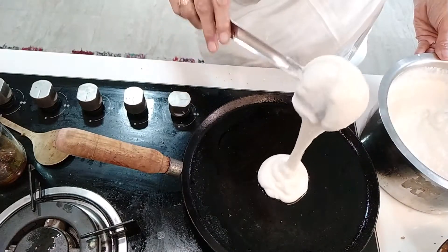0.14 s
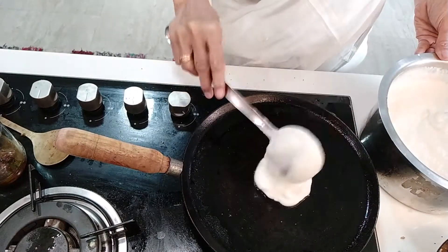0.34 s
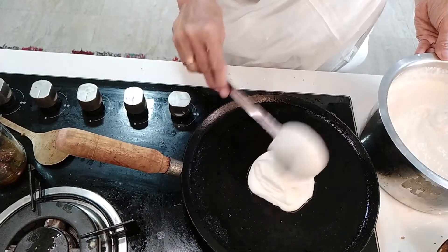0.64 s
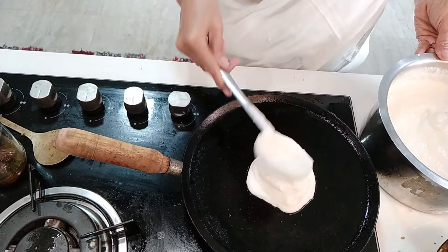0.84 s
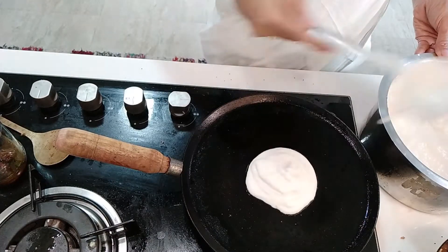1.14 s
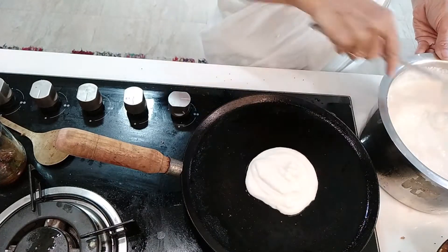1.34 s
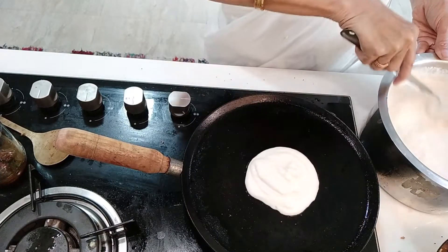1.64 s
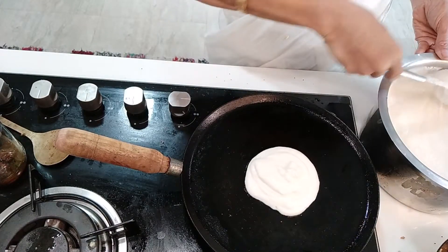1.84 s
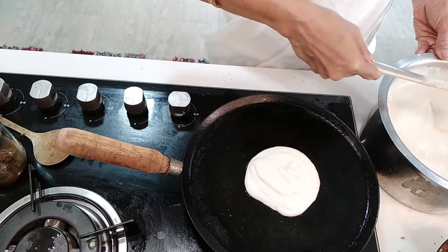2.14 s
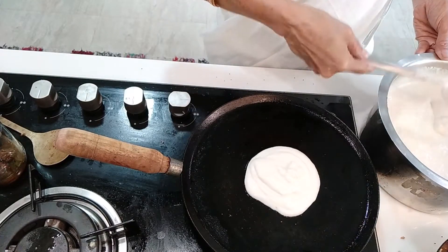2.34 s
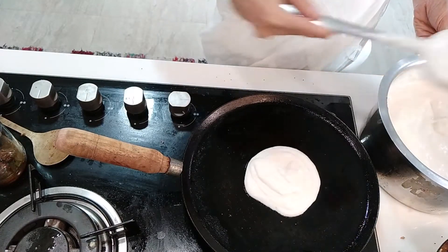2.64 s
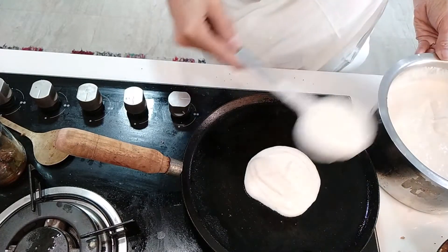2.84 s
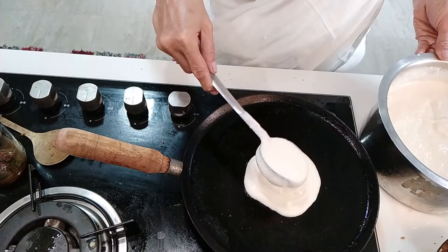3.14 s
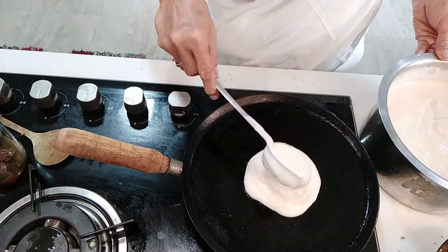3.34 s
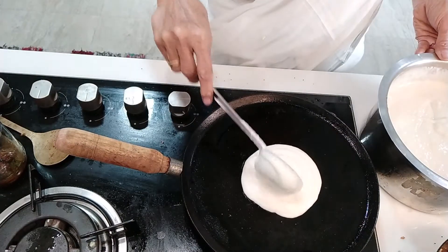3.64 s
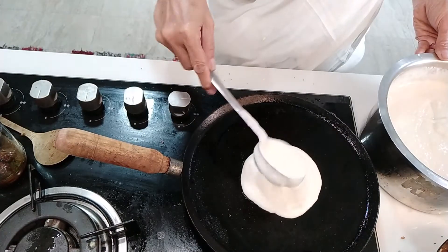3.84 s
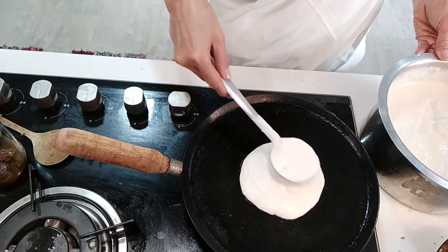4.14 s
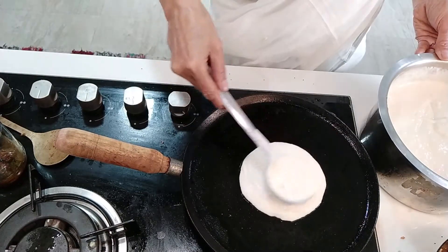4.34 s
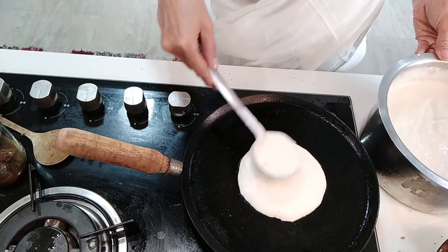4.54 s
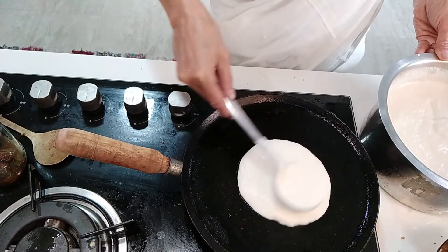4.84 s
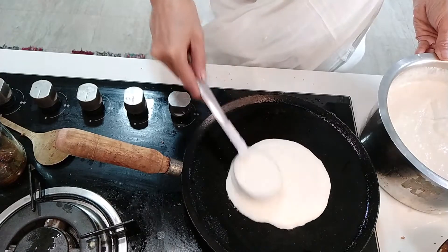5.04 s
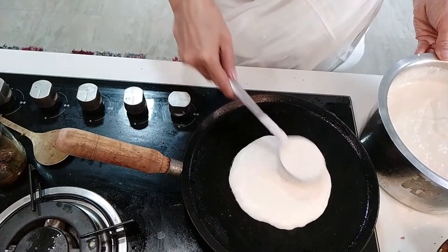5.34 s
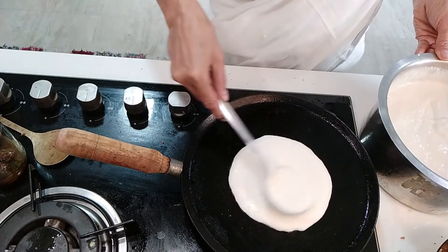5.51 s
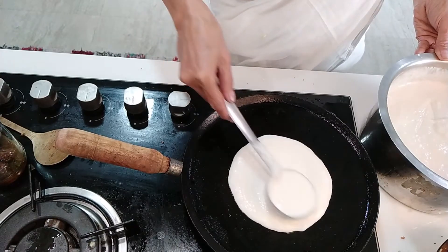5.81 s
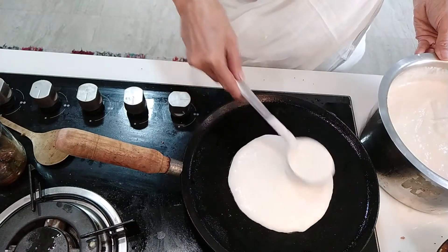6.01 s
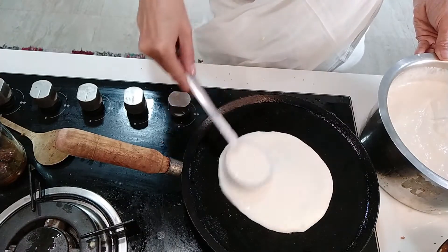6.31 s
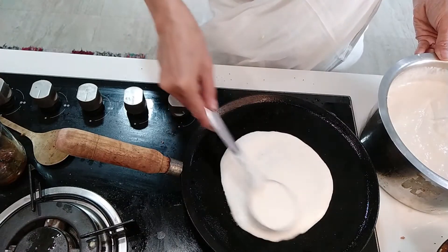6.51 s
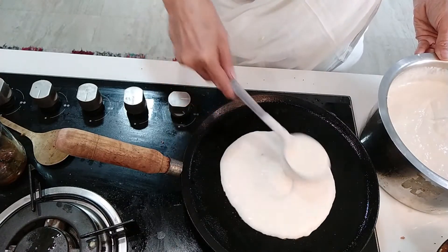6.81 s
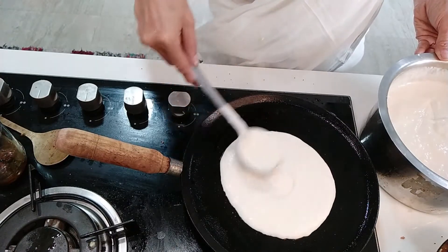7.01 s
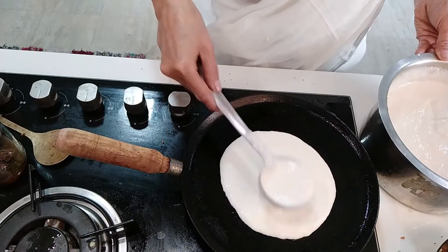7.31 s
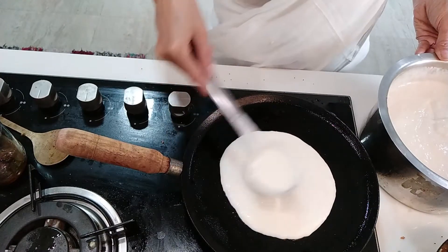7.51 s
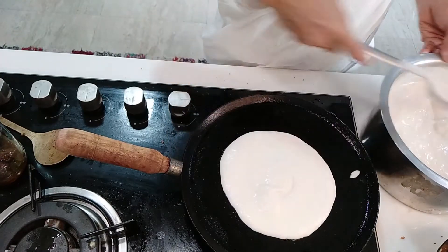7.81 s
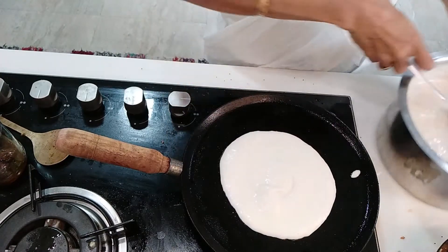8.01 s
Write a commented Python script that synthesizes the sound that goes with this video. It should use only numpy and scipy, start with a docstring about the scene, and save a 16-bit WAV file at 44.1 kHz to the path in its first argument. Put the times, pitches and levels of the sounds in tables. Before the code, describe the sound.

Close, crisp frying sizzle surges and eases with snapping pops over a faint burner whistle, then metal clinks and scrapes at the end.

```python
"""In a small kitchen, thick batter is ladled onto a hot flat griddle and spread in circles.
Steam bubbles burst by the thousand under its edge: each is a click and a very brief ring, coloured by the griddle.
The sizzle swells as batter reaches fresh hot metal, and a few bubbles spit loudly as short bursts of noise.
The steel ladle dips into the batter bowl, and at the end drops back with a ringing clink and a short scrape.
Under it all are a faint noise rumble and the gas burner: whistles of narrow noise and one wavering sine."""
import sys
import numpy as np
from scipy import signal
from scipy.fft import rfft, irfft
from scipy.io import wavfile
from scipy.ndimage import uniform_filter1d

SR = 44100
rng = np.random.default_rng(int(sys.argv[2]) if len(sys.argv) > 2 else 0)


def store_wav(level_fs):
    """Save 16-bit WAV to argv[1]."""
    pcm = np.round(np.clip(np.atleast_2d(level_fs), -1, 1) * 32767)
    wavfile.write(sys.argv[1], SR, pcm.T.astype(np.int16))


N = 359856

# Low background of the kitchen. Each row: frequency in Hz, relative strength in dB per Hz.
RUMBLE_SPECTRUM = [(20, 0), (38, -5), (60, -11), (110, -10), (170, -9.5), (300, -17.5), (640, -28),
                   (1000, -11), (8000, -26)]
RUMBLE_MEAN_DB = -57
# Breathy whistles of the gas burner. Each row: frequency in Hz, width in Hz, level in dB before WHISTLING.
BURNER_WHISTLES = [(983, 53, -50.5), (7570, 45, -51.5), (8700, 68, -58.5)]
# Change in strength of all the burner's whistles. Each row: time in seconds, change in dB.
WHISTLING = [(0, -6.5), (.3, -4.5), (.82, 0), (1.4, -6), (2.3, -13), (3.0, -10), (8.1, -9.5)]
# The burner's one clear note, which wavers with the gas flow; its level too is changed by WHISTLING.
NOTE_HZ, NOTE_WAVER_HZ, NOTE_DB, NOTE_FLUTTER_DB = 1001, 8, -52, 2.2

# Slow course of the boil as the batter heats, spreads and sets.
# Each row: time in seconds, low crackle in dB, fine fizz in dB, both before surges and trims.
BOIL_COURSE = [(0.0, -53, -48.5), (0.32, -43.5, -41.5), (1.2, -42, -38.5), (1.75, -42, -32),
               (2.12, -42.5, -29.7), (2.45, -45, -34.5), (3.0, -46.5, -35), (3.2, -46, -33),
               (3.6, -47.5, -36), (4.0, -43.5, -33.5), (4.72, -39, -30.5), (5.15, -37.5, -26.5),
               (5.95, -40, -29.5), (6.55, -40.5, -31.5), (7.15, -43, -31), (7.8, -47, -34.5)]
# Batter reaching fresh hot metal, mostly pushed by the ladle.
# Each row: start in seconds, rise in seconds, time from start to fall in seconds,
# change in crackle in dB, change in fizz in dB.
FRESH_METAL_SURGES = [(2.506, 0.11, 0.25, 0.5, 3.5), (3.323, .08, 0.16, 5.5, 7), (3.626, .05, 0.12, 1, 3),
                      (4.085, 0.094, 0.31, 1, -0.3), (4.674, 0.16, 0.32, 1.5, 1.5),
                      (5.373, 0.17, 0.4, -0.1, 2), (5.97, 0.23, .38, 2, 3.5), (6.623, 0.12, .6, 1, 2.5)]
SURGE_FALL_S = 0.12
# Deep simmer, which grows overall as the pancake widens and sets. Each row: time in seconds, change in dB.
SIMMER_STRENGTH = [(0, -1.5), (2, -.5), (3.4, 3), (4.6, -2), (5.7, 0), (6.9, 2.5), (7.8, 4)]
# Sound of a bursting bubble. Each row: frequency in Hz, relative strength in dB per Hz.
BUBBLE_SPECTRUM = [(60, -38), (170, -21), (310, -10.5), (420, -15.5), (650, -7), (790, -3), (1200, -8.5),
                   (1600, -1.5), (3700, -7), (6000, -4), (7500, -5.5), (12000, -6.5), (16000, -5.5)]
# Resonances of the griddle and the hob under it. Each row: frequency in Hz, width in Hz, boost in dB.
GRIDDLE_RESONANCES = [(171.4, 17, 10), (471, 29, -14), (523, 75, 6.5), (638, 79, -24), (833, 180, 1.5),
                      (999, 60, 10), (1200, 93, 3), (1385, 150, 3.5), (1940, 44, 1.5), (2153, 140, -7.5),
                      (2330, 74, 0.5), (2700, 185, -4), (3094, 34, 4), (3600, 170, -0.5), (4840, 49, 6),
                      (5680, 110, 3), (5890, 430, -4.5), (6770, 180, 5), (7380, 76, 9), (7440, 410, -4.5)]
# Wetter bubbles: level against the dry ones, number per dry one, middle time to fade by 60 dB.
WET_DB, WET_SHARE, WET_T60_S = -6, 0.3, 0.012
# Echoes are weaker in the bass. Each row: frequency in Hz, change in dB.
ECHO_COLOUR = [(400, -2.5), (2500, 1.5)]

# Single loud spits. Each row: start in seconds, bright snap in dB, dull pop in dB,
# left over right in dB. Snap and pop are levels before filtering.
LOUD_SPITS = [(0.3, -24, -8, 0), (0.305, -24, -8, -2), (0.5535, -15, -20, 2), (1.1115, -24, -14, 0),
              (1.2899, -2, -8, -1), (1.311, -13, -20, -2), (1.6355, -24, -18, 0), (1.66, -15, -8, -2),
              (1.8286, -4, -22, 0), (2.036, -10, -9, 2), (2.0606, -8, -12, 0), (2.212, -9, -9, -5),
              (2.4572, -7, -20, 1), (2.6962, -7, -18, 0), (2.7128, -5, -7, 0), (2.9345, -8, -22, 1),
              (2.9391, -3, -18, 1.5), (3.0514, -5, -20, 2), (3.0976, -10, -22, 2), (3.162, -9, -22, 0),
              (3.189, 1, -9, -1), (3.2823, -6, -13, -2), (3.3282, 0.5, -14, -2), (3.39, -7, -11, 0),
              (3.4285, -1, -16, 0), (3.699, -7, -20, -4), (4.1144, -7, -18, 0), (4.234, -7, -24, 10),
              (4.8089, -3, -16, 0), (4.8333, -1.5, -15, 2), (5.6504, -1, -17, 0), (5.9752, 0, -16, 0),
              (6.0171, -3, -14, 0), (6.284, -3, -16, 0), (7.187, -4, -12, 2), (7.5426, -4, -17, 2),
              (7.7083, -3.5, -22, -1), (7.7277, -6, -22, -0.5), (7.8093, -7, -28, 2), (7.9855, -7, -20, 0)]
# Smaller random spits: number a second, middle levels above the boil, and greatest changes either way.
STRAYS_PER_S = 14
STRAY_OVER_FIZZ_DB, STRAY_OVER_CRACKLE_DB = 11, 7
STRAY_SPREAD_DB, STRAY_PAN_DB = 5, 4

# Ladle against the bowl. Each row: start in seconds, relative clink in dB, relative thud in dB.
LADLE_KNOCKS = [(1.645, -42, -42), (7.9926, -13, -41), (7.996, -12, -47), (7.9972, -11, -31.5),
                (7.9998, -19, -50), (8.034, -25, -38.5), (8.056, -20.5, -43), (8.0623, -27, -43),
                (8.088, -33, -54), (8.122, -25, -54), (8.127, -28.5, -56), (8.149, -35, -52)]
# Ring of the steel bowl and ladle, damped by batter.
# Each row: frequency in Hz, relative level in dB, time to fade by 60 dB in seconds.
STEEL_RINGS = [(3080, -27, 0.12), (4130, -26, 0.12), (5529, -20, 0.12), (6282, -19, 0.25),
               (6471, -19, 0.22), (7838, -20, 0.2), (8899, -19, 0.2), (9448, -21, 0.05), (11600, -20, 0.15)]
# The full bowl rocking on the counter.
# Each row: frequency in Hz, relative level in dB, time to fade by 60 dB in seconds.
BOWL_RINGS = [(182, -20, 0.21), (228, -17.5, 0.27), (287, -11.5, 0.21), (339, -14, 0.42),
              (363, -13.5, 0.37), (398, -9.5, 0.13), (458, -17, 0.071), (1260, -32, 0.4)]
# Steel rubbing on steel. Each row: frequency in Hz, relative strength in dB per Hz.
CONTACT_SPECTRUM = [(150, -20), (600, -14), (1000, -4.5), (2200, -13.5), (4200, -8), (6200, -1), (8300, -2),
                    (10500, -6), (13000, -20), (16000, -20)]
# Broad resonances of the ladle's cup, heard in every knock and scrape.
# Each row: frequency in Hz, width in Hz, boost in dB.
CUP_RESONANCES = [(1400, 300, 4), (2350, 400, 9), (4100, 400, 7), (5400, 320, 5.5), (6440, 350, 7.5),
                  (7850, 300, 2), (8800, 250, 6.5), (9450, 250, 3), (11650, 470, 12), (14200, 1400, 8)]
# Ladle sliding down the bowl wall after it drops; its level is set before the steel colours it.
SLIDE_START_S, SLIDE_LENGTH_S = 8.0, 0.09
SLIDE_DB, SLIDE_FADE_DB_PER_S = -31.5, 600
SLIPS_PER_S, SLIP_SPREAD_DB = 1300, 4

# Resonances of the left microphone port. Each row: frequency in Hz, width in Hz, boost in dB.
LEFT_PORT_RESONANCES = [(8540, 770, 5), (10510, 2650, 13.5)]
# Resonances of the right microphone port. Each row: frequency in Hz, width in Hz, boost in dB.
RIGHT_PORT_RESONANCES = [(8490, 1100, 5.65), (9810, 2070, 12.76)]
CUTOFF_HZ = 15850


def from_db(db):
    """Turn decibels into a multiplier for the wave."""
    return 10 ** (np.asarray(db) / 20)


def rms_one(x):
    """Scale a sound to an average power of 1."""
    return x / np.sqrt(np.mean(x ** 2) + 1e-20)


def in_time(rows):
    """Draw straight lines between a table's rows, giving each column a value at every sample."""
    seconds, *columns = np.transpose(rows)
    return [np.interp(np.arange(N) / SR, seconds, column) for column in columns]


def drift(rate):
    """Wander smoothly at random, with RMS 1 and `rate` random points a second."""
    points = rng.standard_normal(4096)
    return rms_one(np.interp(np.arange(N) / SR * rate, np.arange(len(points)), points))


def coloured(x, spectrum=((1, 0),), peaks=(), size=16384):
    """Filter by a broad spectrum with resonances on top; minimum phase means nothing sounds early."""
    half = size // 2
    hz = np.arange(half + 1) * SR / size
    corner_hz, corner_db = np.transpose(spectrum)
    db = np.interp(np.log(hz + 1), np.log(corner_hz), corner_db)
    for centre, width, height in peaks:
        db = db + height / (1 + (2 * (hz - centre) / width) ** 2)
    # folding the cepstrum onto positive time gives the minimum-phase response
    cepstrum = irfft(db * np.log(10) / 20)
    cepstrum[1:half] *= 2
    cepstrum[half + 1:] = 0
    response = irfft(np.exp(rfft(cepstrum)))[:half]
    return signal.oaconvolve(np.atleast_2d(x), [response], axes=-1)[:, :N]


def band(x, kind, edge_hz):
    """Keep part of the spectrum with a third-order Butterworth filter."""
    return signal.sosfilt(signal.butter(3, edge_hz, kind, fs=SR, output="sos"), x)


def both_ways_high(x, edge_hz):
    """Keep the treble, filtering forwards and backwards so that it stays in step with x."""
    return signal.sosfiltfilt(signal.butter(3, edge_hz, "high", fs=SR, output="sos"), x)


def ring(clicks, hz, t60):
    """A damped resonance: each click starts a sine that fades by 60 dB in t60 seconds."""
    radius = from_db(-60 / (t60 * SR))
    turn = 2 * np.pi * hz / SR
    return signal.lfilter([0, np.sin(turn)], [1, -2 * radius * np.cos(turn), radius ** 2], clicks + 1e-18)


def burst(t60):
    """Half a second of stereo noise that fades by 60 dB in t60 seconds."""
    return rng.standard_normal((2, SR // 2)) * from_db(-60 * np.arange(SR // 2) / SR / t60)


def add(out, start_s, sound):
    """Mix a sound in at a given time."""
    at = min(round(start_s * SR), N - 1)
    out[..., at:at + sound.shape[-1]] += sound[..., :N - at]


def two_mics(x, lag_us):
    """A sound reaches the left microphone `lag_us` microseconds later than the right."""
    taps = np.arange(-8, 9)
    left = np.convolve(x, np.sinc(taps - lag_us * SR / 10 ** 6), "same")
    return np.array([left, x])


def kitchen(x, near_db, room_db, near_t60=0.058, room_t60=0.075):
    """Direct sound, quick scatter from hob and counter, then the room; each call draws its own echoes."""
    response = np.zeros((2, SR // 2))
    for level_db, t60, delay_s in ((near_db, near_t60, .0007), (room_db, room_t60, .006)):
        tail = np.pad(burst(t60), ((0, 0), (round(delay_s * SR), 0)))[:, :SR // 2]
        response += from_db(level_db) * rms_one(tail) / np.sqrt(SR // 2)
    echoes = signal.oaconvolve(x, coloured(response, ECHO_COLOUR, size=1024), axes=-1)[:, :N]
    return x + echoes


def background(shared=0.61, rumble_swing_db=2.2):
    """Uneven rumble and breathy burner whistles from noise partly alike on both sides, plus one note."""
    noise = rng.standard_normal((2, N)) + shared * rng.standard_normal(N)
    whistles = np.zeros((2, N))
    for hz, width, db in BURNER_WHISTLES:
        t60 = np.log(1000) / (np.pi * width)   # a narrower resonance rings longer
        whistles += from_db(db) * rms_one(ring(noise, hz, t60))
    phase = 2 * np.pi * np.cumsum(NOTE_HZ + NOTE_WAVER_HZ * drift(45)) / SR
    note = rms_one(np.sin(phase)) * from_db(NOTE_DB + NOTE_FLUTTER_DB * drift(25))
    rumble_db = RUMBLE_MEAN_DB + rumble_swing_db * drift(16)
    rumble = from_db(rumble_db) * rms_one(coloured(noise, RUMBLE_SPECTRUM))
    return rumble + from_db(in_time(WHISTLING)[0]) * (whistles + note)


def bubbles(per_s, size_db, pop_t60, snap, count=6):
    """Bubbles burst at random, many small and few large: each is a snap and a very brief ring."""
    at = np.flatnonzero(rng.random(N) < per_s / SR)
    size = from_db(size_db * np.minimum(rng.exponential(1, N)[at], 3.3))
    strength = size * rng.choice([-1, 1], N)[at]
    kind = rng.integers(0, count, N)[at]
    out = np.zeros(N)
    for k, pitch_hz in enumerate(np.linspace(3500, 14500, count)):
        clicks = np.zeros(N)
        clicks[at] = strength * (kind == k)
        out += snap * clicks + ring(clicks, pitch_hz, pop_t60)
    return out


def droplets(per_s, size_db, t60, size=512):
    """Wetter bubbles ring on a little longer, each at a pitch of its own; average power 1."""
    at = np.flatnonzero(rng.random(N) < per_s / SR)
    pitch, strength, life = rng.random((3, N))[:, at, None]
    age = np.arange(size) / SR
    level_db = -size_db * np.log(np.maximum(strength, .04)) - 60 * age / (t60 * (.5 + life))
    rings = from_db(level_db) * np.sin(2 * np.pi * (1800 + 11000 * pitch) * age)
    places = (at[:, None] + np.arange(size)).ravel()
    return rms_one(np.bincount(places, rings.ravel(), N + size)[:N])   # sums overlapping rings


def batter_edge(per_s, lag_us=-12, lag_spread_us=62, flare_db=3.5, count=12):
    """Places round the edge flare up at random; each has its own echoes and direction, so colour shifts."""
    out = 0
    for side in np.cos(np.pi * (np.arange(count) + .5) / count):
        dry_pops = rms_one(bubbles(per_s / count, size_db=2.0, pop_t60=0.00066, snap=0.85))
        wet_pops = droplets(WET_SHARE * per_s / count, size_db=2.2, t60=WET_T60_S)
        pops = (dry_pops + from_db(WET_DB) * wet_pops) * from_db(flare_db * drift(9))
        out = out + kitchen(two_mics(pops, lag_us + side * lag_spread_us), near_db=-3.5, room_db=-4.5)
    # even out the level, since the boil sets it later
    return out / np.sqrt(uniform_filter1d(np.mean(out ** 2, axis=0), SR // 16) + 1e-12)


def surges():
    """Changes in crackle and fizz in dB: each ramps in, holds while the batter moves, and settles."""
    t = np.arange(N) / SR
    out = np.zeros((2, N))
    for start, rise, length, crackle_db, fizz_db in FRESH_METAL_SURGES:
        rising = (t - start) / rise
        falling = 1 - (t - start - length) / SURGE_FALL_S
        out += np.outer([crackle_db, fizz_db], np.clip(np.minimum(rising, falling), 0, 1))
    return out


def sizzle(low_split_hz=2750, high_split_hz=7500, finest_hz=11500, hiss_trim_db=3.5, fizz_trim_db=-6.5,
           clump_db=1.5, hiss_share=0.23, simmer_hz=620, simmer_patchy_db=2.5):
    """Harder boiling means more bubbles and stronger fizz; they come in clumps, so the sizzle sputters."""
    crackle_db, fizz_db = in_time(BOIL_COURSE) + surges() + .25 * drift(13)
    hiss_db = crackle_db + hiss_share * (fizz_db - crackle_db)   # middle-sized bubbles follow both
    per_s = 4000 * from_db(.6 * (fizz_db + 35.5) + clump_db * drift(70))
    sound = coloured(batter_edge(per_s), BUBBLE_SPECTRUM, GRIDDLE_RESONANCES)
    sputter = drift(40)
    crackle = rms_one(band(sound, "low", low_split_hz))
    crackle = crackle * from_db(crackle_db + .5 * drift(45))
    hiss = rms_one(band(sound, "band", [low_split_hz, high_split_hz]))
    hiss = hiss * from_db(hiss_db + hiss_trim_db + 1.09 * sputter)
    fizz = rms_one(band(sound, "high", high_split_hz))
    fizz = fizz * from_db(fizz_db + fizz_trim_db + 0.5 * sputter)
    # while the batter is still cool the very finest bubbles are missing
    coolness = np.clip((-34.5 - fizz_db) / 11, 0, 1)
    finest = both_ways_high(fizz, finest_hz)
    # large slow bubbles under the pancake come and go
    deep = signal.sosfiltfilt(signal.butter(3, simmer_hz, "low", fs=SR, output="sos"), crackle)
    simmer = from_db(in_time(SIMMER_STRENGTH)[0] + simmer_patchy_db * drift(16))
    return (crackle - deep) + simmer * deep + hiss + fizz - coolness * finest


def stray_spits():
    """Smaller spits come at random, as loud as the boil allows: rows like those of LOUD_SPITS."""
    crackle_db, fizz_db = in_time(BOIL_COURSE) + surges()
    at = np.flatnonzero(rng.random(N) < STRAYS_PER_S / SR)
    snap, pop, side = rng.uniform(-1, 1, (3, N))[:, at]
    snap_db = fizz_db[at] + STRAY_OVER_FIZZ_DB + STRAY_SPREAD_DB * snap
    pop_db = crackle_db[at] + STRAY_OVER_CRACKLE_DB + STRAY_SPREAD_DB * pop
    return list(zip(at / SR, snap_db, pop_db, STRAY_PAN_DB * side))


def spits(snap_db=-2.5, spray_db=-10.5, spray_t60=0.0075, spray_delay_s=0.0004, split_hz=5800,
          pop_low_hz=1300, top_hz=14500, lag_us=-14, size=512):
    """A trapped pocket of steam breaks out with a sharp snap and a duller pop; a tiny spray follows."""
    snaps, pops = np.zeros((2, 2, N))
    age = np.arange(size) / SR
    for start, bright_db, dull_db, pan_db in [*LOUD_SPITS, *stray_spits()]:
        spray = rng.standard_normal(size) * from_db(spray_db - 60 * age / spray_t60)
        crack = spray * (age > spray_delay_s)
        crack[0] = from_db(snap_db)
        crack = two_mics(np.pad(crack, (10, 0)), lag_us)   # silence leaves room for the lag filter
        crack = crack * from_db(np.array([[pan_db], [-pan_db]]) / 2)
        add(snaps, start + 0.00045, from_db(bright_db) * crack)
        add(pops, start + 0.00054, from_db(dull_db) * crack)
    both = band(snaps, "high", split_hz) + band(pops, "band", [pop_low_hz, split_hz])
    sound = coloured(band(both, "low", top_hz), BUBBLE_SPECTRUM, GRIDDLE_RESONANCES)
    return kitchen(sound, near_db=-3, room_db=-28, near_t60=0.035)


def slide():
    """The ladle slides down the bowl wall in tiny uneven slips, heard as a dense run of clicks."""
    age = np.arange(N) / SR - SLIDE_START_S
    slide_db = SLIDE_DB - SLIDE_FADE_DB_PER_S * np.maximum(age - SLIDE_LENGTH_S, 0)
    slips = (rng.random(N) < SLIPS_PER_S / SR) * rng.choice([-1, 1], (2, N))
    slips = slips * from_db(SLIP_SPREAD_DB * rng.uniform(-1, 1, N))
    return (age > 0) * rms_one(slips) * from_db(slide_db)


def ladle(ring_db=-11, crack_t60=0.011):
    """Each knock cracks as noise, rings the steel and rocks the bowl; the last fall ends in a scrape."""
    cracks, clinks, thuds = np.zeros((2, N)), np.zeros((2, N)), np.zeros(N)
    for start, clink_db, thud_db in LADLE_KNOCKS:
        add(cracks, start, from_db(clink_db) * burst(crack_t60))
        add(clinks, start, from_db(clink_db + ring_db + rng.normal(0, 1.7, (2, 1))))
        add(thuds, start, from_db([thud_db]))
    steel = sum(from_db(db) * ring(clinks, hz, t60) for hz, db, t60 in STEEL_RINGS)
    bowl = sum(from_db(db) * ring(thuds, hz, t60) for hz, db, t60 in BOWL_RINGS)
    bowl = band(bowl, "high", 150)
    rubbing = coloured(cracks + slide(), CONTACT_SPECTRUM, CUP_RESONANCES)
    return kitchen(rubbing + steel + bowl, near_db=-6, room_db=-28)


def scene():
    """Kitchen background, griddle and ladle together."""
    return background() + sizzle() + spits() + ladle()


def record(dry):
    """Each microphone port rings in the treble at its own pitches; the very top is cut."""
    left = coloured(dry[0], peaks=LEFT_PORT_RESONANCES)
    right = coloured(dry[1], peaks=RIGHT_PORT_RESONANCES)
    top_cut = signal.ellip(12, .1, 80, CUTOFF_HZ, fs=SR, output="sos")
    return signal.sosfilt(top_cut, np.vstack([left, right]))


dry = scene()
out = record(dry)
store_wav(out)
```